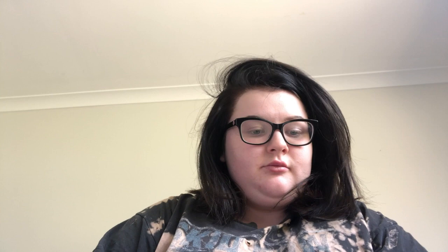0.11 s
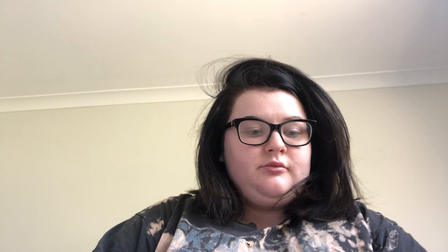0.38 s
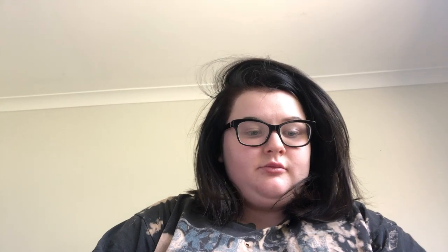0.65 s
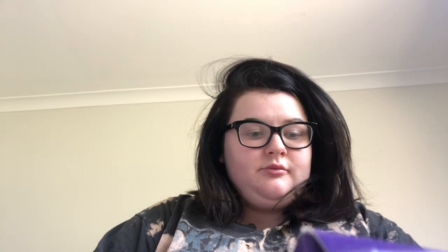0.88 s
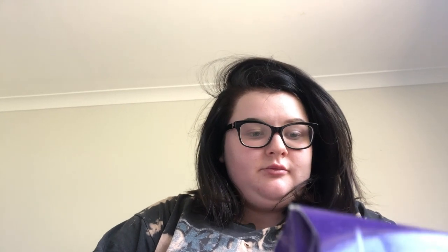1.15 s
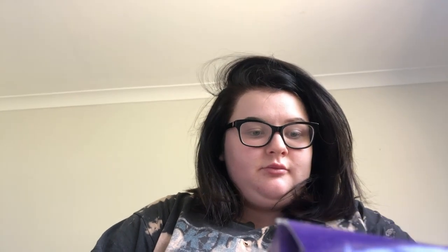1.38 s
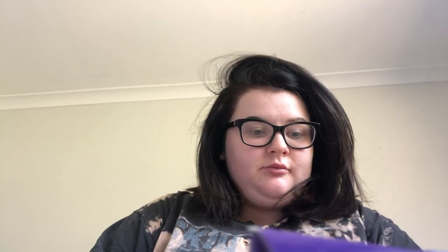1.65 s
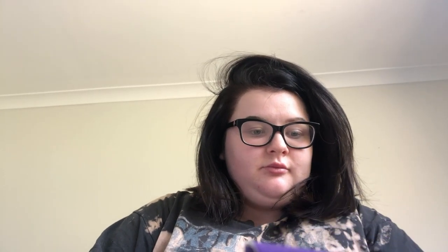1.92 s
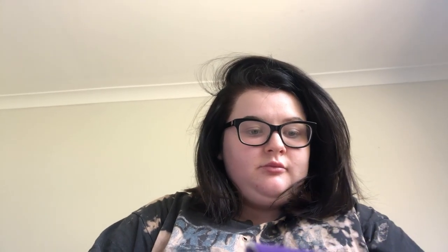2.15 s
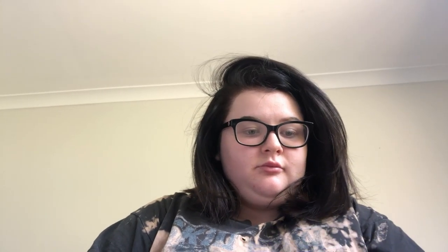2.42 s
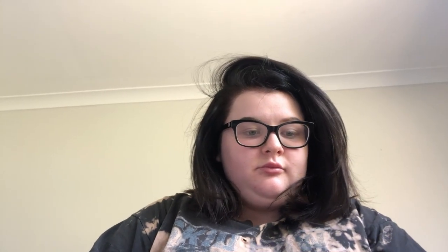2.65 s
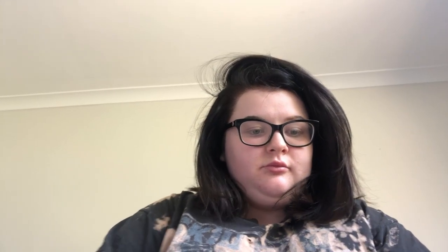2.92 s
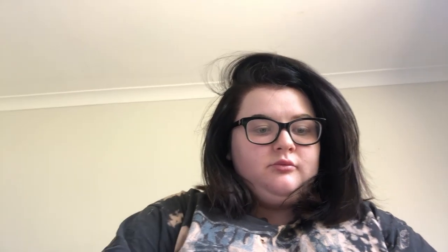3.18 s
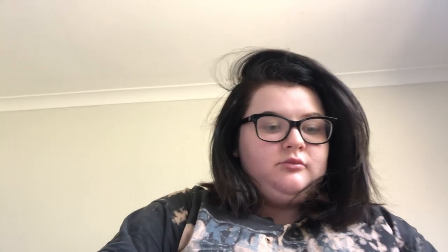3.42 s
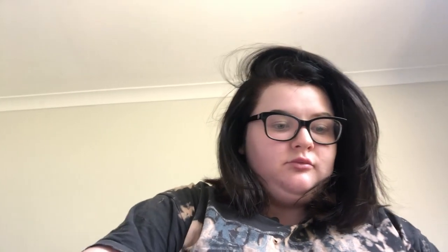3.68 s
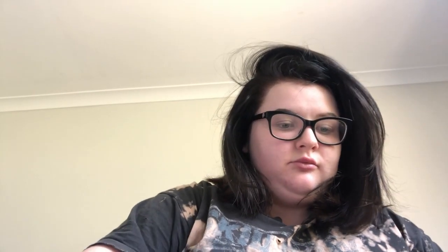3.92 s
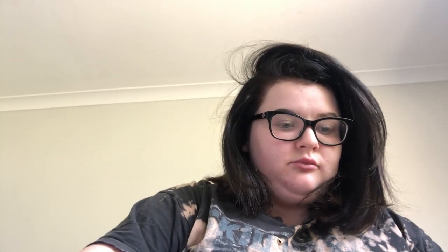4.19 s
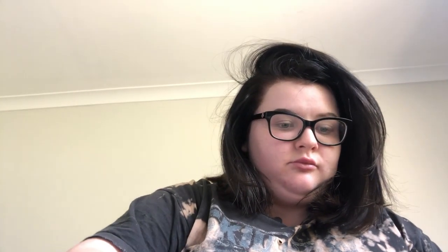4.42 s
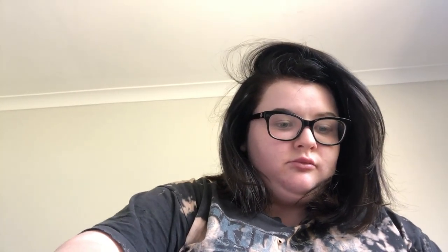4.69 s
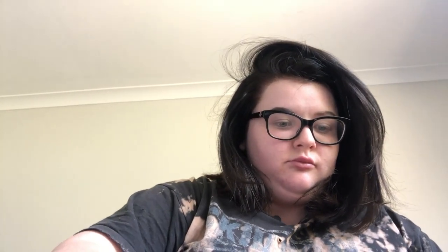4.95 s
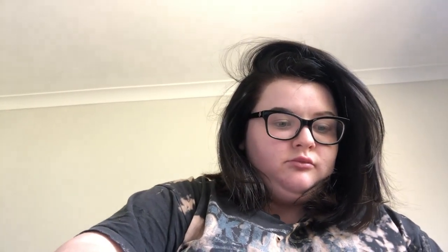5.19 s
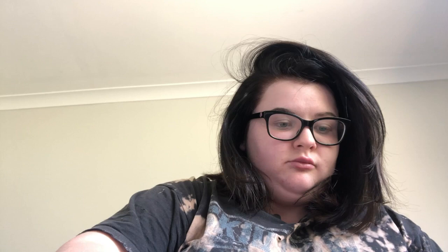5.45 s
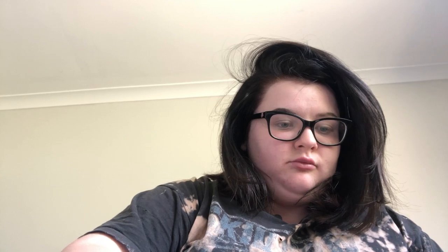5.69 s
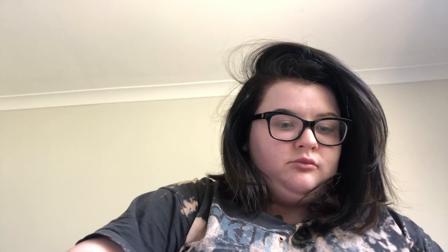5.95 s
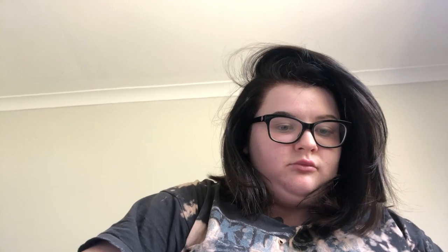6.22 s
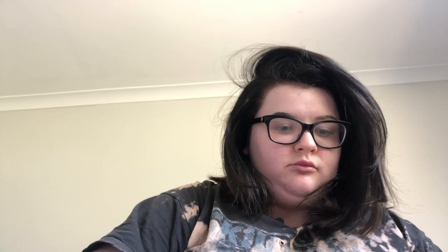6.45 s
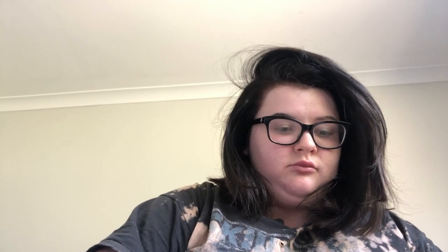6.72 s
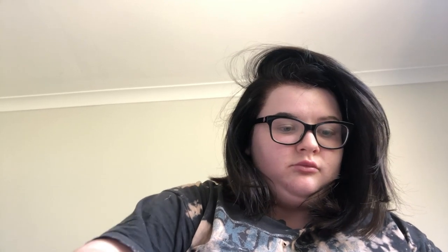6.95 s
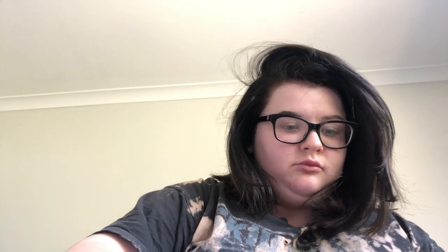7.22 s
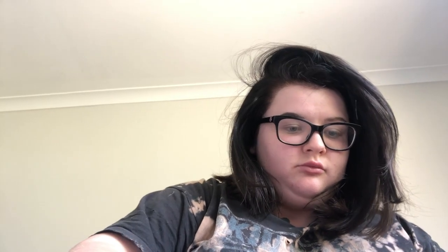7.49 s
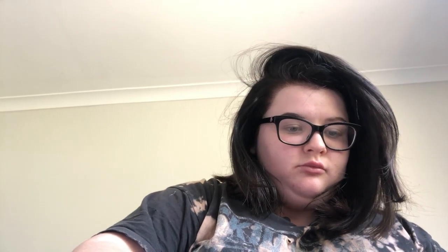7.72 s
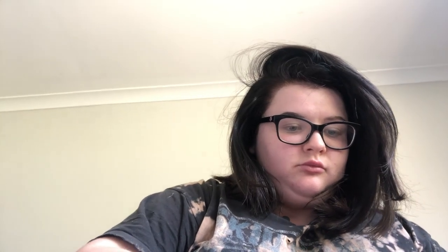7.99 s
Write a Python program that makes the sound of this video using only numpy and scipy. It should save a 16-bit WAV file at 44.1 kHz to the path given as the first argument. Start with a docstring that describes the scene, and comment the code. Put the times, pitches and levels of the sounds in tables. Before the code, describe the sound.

A cardboard and paper package is opened by hand close to a small microphone in a quiet, lightly reflective room with faint steady air hiss. From 0 to 2 seconds, quick irregular ticks and dry papery crinkles cluster, with a few firmer snaps near the start and soft finger sliding. Crackling thins around 2 seconds, then picks up briefly at 2.5 to 2.8. A sharp, isolated snap lands at 3.3, followed by sparse small creaks and rustles. At 4.8 to 4.9 stiff card cracks loudly, again near 5.2, 5.4 and 5.6, each abrupt and short. The strongest pair hits at 6.4 to 6.5, then dense fine crackling leads to heavy pops with hollow box knocks at 7.0 and 7.2. Smaller snaps follow at 7.3 and 7.65, a brief lull, and light crinkling with a couple of moderate snaps closes around 8 seconds.

```python
"""Hands open a cardboard and paper package close to a small microphone in a quiet room.
Light snaps and crinkles come first, then a loud snap at 3.3 s, the loudest from 4.8 to 7.2 s, and a few to the end.
Snaps and crinkles are short noise bursts that ring the card; knocks of the box are fading tones. All three
spread as bending waves, treble first and bass last. Fingers slide and the box flexes as surging noise.
Desk and walls answer briefly, and still air hisses softly throughout."""
import sys
import numpy as np
from scipy import signal
from scipy.fft import rfft, irfft, next_fast_len
from scipy.io import wavfile
from scipy.ndimage import map_coordinates

SR = 44100
rng = np.random.default_rng(int(sys.argv[2]) if len(sys.argv) > 2 else 0)


def unload_wav(signal):
    """Save mono or channel-first audio to the path in sys.argv[1] as 16-bit WAV at rate SR, clipped to [-1, 1]."""
    wavfile.write(
        sys.argv[1],
        SR,
        np.round(np.clip(np.atleast_2d(signal).T, -1, 1) * 32767).astype(np.int16),
    )


def rack_gain(trim_db):
    """Turn a fader trim in dB into the linear factor to multiply a signal by."""
    fader = np.asarray(trim_db, float)
    return 10 ** (fader / 20)


N = 357651  # length [samples]

# Strong creases that buckle, before the card spreads the sound:
# (time [s], level [dB], card ring [Hz], dry crack over that level [dB])
SNAPS = [(0.025, -33, 2900, -21), (0.0346, -24, 2470, -42), (0.0583, -37, 2820, -9),
         (0.2574, -43.5, 2830, -13), (0.3562, -41, 1790, -25), (0.3719, -24.5, 1570, -20),
         (0.3817, -46, 1920, -2), (0.427, -40, 3430, -6), (0.441, -34, 2470, -3.5),
         (0.4572, -36, 3820, -4.5), (0.513, -36, 2530, -18), (0.5496, -37.5, 1700, -3),
         (0.5792, -34, 1870, 0), (0.596, -37.5, 2970, -10), (0.657, -38, 1900, -33),
         (0.7046, -38.5, 2380, -16), (0.794, -36, 1960, -10.5), (0.815, -34.5, 2550, -16),
         (0.8575, -38, 3100, -16), (0.886, -36.5, 1900, -6.5), (0.942, -31.5, 850, -11),
         (0.9688, -33.5, 3020, -8.5), (1.0088, -36.5, 3160, -9), (1.0215, -45, 2600, -5),
         (1.0488, -35, 3100, -6), (1.0996, -32.5, 3320, -7.5), (1.1225, -40.5, 2670, -7),
         (1.1684, -36, 2970, -3), (1.2702, -42, 3550, -8.5), (1.3957, -34, 2650, -13),
         (1.475, -36, 3350, -5), (1.528, -35.5, 2960, -22), (1.6165, -37, 1140, -14),
         (1.663, -37.5, 2520, -11), (1.7466, -31.5, 3580, -7.5), (1.7809, -33.5, 1240, -6.5),
         (1.9376, -34, 1830, -41), (1.984, -40, 1310, -40), (2.0072, -38.5, 2210, -10),
         (2.266, -45.5, 2980, -2.5), (2.36, -41, 1900, -39), (2.4713, -41, 3100, -6),
         (2.536, -33, 4350, -15), (2.5917, -44, 2790, 1.5), (2.6048, -37.5, 3730, 5),
         (2.6388, -30.5, 2330, -5.5), (2.7176, -42, 2390, -2), (2.7357, -41, 3520, 0),
         (2.765, -40, 1334, -9), (2.9883, -44, 2490, -6), (3.3126, -17.5, 2400, -17),
         (3.7376, -31, 1710, -30), (4.0352, -39, 2620, -10.5), (4.153, -48.5, 1720, -11),
         (4.2007, -46.5, 2200, -3), (4.233, -46, 1600, -18), (4.326, -38.5, 1360, -14),
         (4.3729, -35, 2240, -5.5), (4.4683, -40, 2450, -16), (4.574, -29.5, 1010, -28),
         (4.7104, -35, 2500, -31), (4.7323, -41, 2670, -13), (4.762, -44, 2540, -17),
         (4.7874, -39, 2470, 4.5), (4.8397, -17, 1320, -8), (4.8902, -9.5, 1250, -7.5),
         (4.9284, -40.5, 1510, -7), (5.069, -37, 2860, -9.5), (5.114, -29.5, 710, -44),
         (5.1592, -13, 1070, -4.5), (5.227, -38.5, 2870, -1), (5.3468, -29, 1110, -51),
         (5.3998, -18, 1880, -9.5), (5.4325, -37.5, 2750, -10), (5.6005, -27, 850, -27),
         (5.6429, -11.5, 935, -6.5), (5.7184, -37, 2600, -8.4), (5.7354, -33.5, 2160, -14),
         (5.8335, -32, 1330, -16), (5.8755, -35, 1500, -11.5), (6.1526, -36, 1410, -6),
         (6.2252, -28, 2680, -8), (6.3048, -35.5, 2470, -17), (6.3528, -27, 1000, -37),
         (6.3825, -33.5, 3180, 2), (6.4054, -6.5, 1670, -26.5), (6.4736, -7.5, 3040, -17),
         (6.56, -40, 2920, 2.5), (6.6182, -38, 2740, -15), (6.6568, -38, 1600, -7),
         (6.6855, -35.5, 2700, -5), (6.7647, -37.5, 3110, -11), (6.7793, -33, 2860, -6.5),
         (6.8159, -37.5, 2970, -11), (6.8373, -35.5, 3070, -27), (6.8767, -36.5, 2940, -17),
         (6.9112, -38, 2930, -21), (6.924, -34.5, 1410, -9), (6.9497, -32, 2850, -4.5),
         (6.998, -35.5, 2060, -34), (7.016, -10, 1200, -24), (7.1337, -35, 774, -38),
         (7.178, -19.5, 725, -10.5), (7.1901, -10, 1500, -14), (7.2149, -9.5, 1680, -40),
         (7.333, -23, 1580, -14), (7.453, -43.5, 1490, -18), (7.4849, -42.5, 2970, -16),
         (7.61, -49, 1500, -9), (7.6395, -43, 1270, -8), (7.6531, -18.5, 2230, -17),
         (7.9157, -35.5, 1660, -6.5), (7.9625, -30, 2400, -3.5), (7.9915, -39, 2530, -10),
         (8.0495, -28.5, 1310, -15), (8.0692, -23, 1440, -35)]
# Tone colour of creased card: (frequency [Hz], relative level [dB])
CARD = [(200, -19.5), (400, -12.5), (650, -5.5), (1200, -0.5), (3200, -3.5), (4600, -11.5), (6500, -21),
        (9000, -37.5)]
# Tone colour of a dry crack or paper hiss: (frequency [Hz], relative level [dB])
CRACK = [(3000, -2), (5500, 10), (7000, 9.5), (9500, 3.5), (15000, -2), (17000, -43.5)]


def unit(x):
    """Scales a sound to an rms of 1."""
    return x / np.sqrt(np.mean(x ** 2) + 1e-20)


def along(points, hz):
    """Reads (frequency, value) points as a curve on a log frequency axis."""
    point_hz, value = np.transpose(points)
    return np.interp(np.log(hz + 1), np.log(point_hz + 1), value)


def bell(hz, at_hz, width):
    """A bump of height 1 on a log frequency axis."""
    return np.exp(-(np.log((hz + 1) / at_hz) / width) ** 2)


def filtered(x, response):
    """Multiplies the spectrum of x by a response to frequency."""
    size = next_fast_len(x.shape[-1] + 8192)
    hz = np.fft.rfftfreq(size, 1 / SR)
    return irfft(rfft(x, size) * response(hz), size)[..., :x.shape[-1]]


def hiss(spectrum):
    """Noise coloured by a spectrum, with an rms of 1."""
    return unit(filtered(rng.standard_normal(N), lambda hz: rack_gain(along(spectrum, hz))))


def wobble(rate):
    """A smooth random curve with rate random points a second."""
    return map_coordinates(rng.standard_normal(N // 100), [np.arange(N) * rate / SR])


def laid(sounds, time_s, lead):
    """Adds rows of sound at their times; each row starts lead samples early."""
    at = np.round(time_s * SR).astype(int) + np.arange(sounds.shape[1])
    return np.bincount(at.ravel(), sounds.ravel(), N + 2 * sounds.shape[1])[lead:lead + N]


def snaps():
    """Strong creases buckle, each giving way for a slightly different time."""
    typical_t60_s, spread = 0.021, 0.48
    t60_s = typical_t60_s * np.exp(spread * rng.standard_normal((len(SNAPS), 1)))
    return buckles(np.hstack([SNAPS, t60_s]), ring_db=10.0, ring_width=0.16, size=4096)


def buckles(rows, ring_db, ring_width, size):
    """Each crease bursts, ringing the card with a dry crack; strong ones start with a jump."""
    time_s, db, ring_hz, crack_db, t60_s = np.transpose(rows)[:, :, None]
    lead = size // 8  # silence ahead of each burst
    t = np.maximum(np.arange(size) - lead, 0) / SR
    hard = np.clip((db + 28.5) / 16, 0, 1)  # 0 for weak creases, 1 for the strongest
    t60_s = np.clip(t60_s, .005, .09)
    rise = 1 - np.exp(-t / (.0001 + 0.044 * t60_s * (1 - hard)))  # long weak creases creep in

    hz = np.fft.rfftfreq(size, 1 / SR)
    jolt = 5 * bell(hz, 2960, 0.074) - 9 * bell(hz, 5300, 0.14) + 11 * bell(hz, 23000, 0.87)
    jolt_db = hard * jolt  # stiff board struck suddenly
    card_db = along(CARD, hz) + (ring_db - 3 * hard) * bell(hz, ring_hz, ring_width)

    draws = rng.standard_normal((len(rows), size + size // 32))
    jerks = np.repeat(draws[:, size:], 32, axis=1)
    noise = draws[:, :size] * rack_gain(3.9 * jerks)  # fibres give way in tiny jerks

    def burst(colour_db, level_db, jump, jump_s):
        fade = rack_gain(-60 * t / t60_s) + 2.0 * hard * rack_gain(-60 * t / jump_s)
        push = rise * noise * fade
        push[:, lead + 8] += jump * hard[:, 0]
        part = irfft(rfft(push) * rack_gain(colour_db + jolt_db), size)
        return rack_gain(level_db) * part / np.abs(part).max(axis=1, keepdims=True)

    ring = burst(card_db, db, jump=7, jump_s=.008)
    crack = burst(along(CRACK, hz), db + crack_db, jump=12, jump_s=.004)
    return laid(ring + crack, time_s, lead)


def crinkles(count, spread_db, mean_hz):
    """Many small creases buckle at chance moments, with uneven sizes, as the hands pull."""
    draws = rng.random((count, 5))
    time_s = draws[:, 0] * N / SR
    times, crinkle_db, hiss_db, *_ = hands()
    db = np.interp(time_s, times, crinkle_db) + 7.0 - spread_db * np.log(draws[:, 1] + 0.075)
    ring_hz = mean_hz * np.exp(1.84 * (draws[:, 2] - .5))
    crack_db = np.interp(time_s, times, hiss_db) + .7 + 12 * (draws[:, 3] - .5)
    t60_s = 0.013 + 0.023 * draws[:, 4]
    rows = np.transpose([time_s, db, ring_hz, crack_db, t60_s])
    return buckles(rows, ring_db=9.5, ring_width=0.096, size=1024)


def hands():
    """Times and levels [dB] of crinkle, hiss over crinkle, slide and flexing: pulls, settling, rest."""
    # Pulls of the hands, levels before each sound's own trim: (start [s], length [s], crinkle level [dB],
    # paper hiss over crinkle [dB], finger slide over crinkle [dB], box flexing level [dB])
    pulls = [(0.0, 0.054, -57, -9, -3.5, -70), (0.366, 0.1, -53.5, -19, -15, -67),
             (0.508, 0.11, -50, -10, -5.5, -86), (0.647, 0.092, -52, -24, -15, -72),
             (0.742, 0.41, -53.5, -11.5, -4.5, -71), (1.274, 0.3, -56.5, -18, -12, -70.5),
             (1.615, 0.32, -57, -16, -4, -78), (1.852, .15, -57.5, -26, -4.5, -64.5),
             (2.033, 0.14, -56, -36, -5, -64.5), (2.255, 0.58, -57, -20, -7.5, -70),
             (2.543, 0.16, -47.5, -12.5, -3.5, -56.5), (2.707, .07, -61.5, -13, -10, -65.5),
             (2.963, 0.21, -57.5, -9.5, -4.5, -67), (3.22, 0.16, -56, -11.5, -6, -61),
             (3.441, 0.14, -63.5, -9.5, -1, -74), (3.678, 0.1, -53.5, -12, 1, -63),
             (3.794, 0.16, -54.5, -15.5, -1.5, -64), (3.999, 0.078, -59.5, -22, -4, -70),
             (4.212, 0.089, -62, -15, -12, -73), (4.334, 0.31, -57, -18, -9.5, -68),
             (4.693, 0.26, -50.5, -16.5, -5, -59.5), (5.262, 0.032, -59, -9, -14, -78),
             (5.83, .13, -55, -22, -6, -63), (5.962, 0.068, -48, -10, -4, -62),
             (6.042, 0.29, -57.5, -16, -4.5, -58), (6.625, 0.088, -54, -23, -4.5, -74),
             (6.766, .13, -57.5, -16, -3.5, -64.5), (6.928, 0.086, -51, -20, -16, -70),
             (7.116, 0.068, -56, -18, -4, -55.5), (7.502, 0.3, -73, -32, -1, -73),
             (7.909, 0.083, -56.5, -16, -8, -61), (8.025, 0.13, -50, -13, -2.5, -56.5)]
    # Settling card, over its crinkle: (hiss [dB], slide [dB], flexing [dB])
    settle_over_db = (-17.5, 0.5, -7.5)
    # Hands at rest: (crinkle [dB], hiss [dB], slide [dB], flexing [dB])
    rest_db = (-72, -82.5, -83.5, -74.5)
    t = np.arange(0, N, 128) / SR
    start, length, crinkle_db, hiss_db, slide_db, flex_db = np.transpose(pulls)[:, :, None]

    # a pull swells to its middle, starts and ends quickly
    arch_db, rise_db_per_s, fall_db_per_s = 6, 603, 297.5
    early, late = np.maximum(start - t, 0), np.maximum(t - start - length, 0)
    arch = np.clip(2 * (t - start) / length - 1, -1, 1) ** 2
    pull_db = -arch_db * arch - rise_db_per_s * early - fall_db_per_s * late

    # after a snap the card settles: level under the snap, then a steady fade
    settle_db, settle_db_per_s = -39, 150.5
    snap_s, snap_db = np.transpose(SNAPS)[:2, :, None]
    fading_db = snap_db + settle_db - settle_db_per_s * np.abs(t - snap_s)
    settle = np.sum((t > snap_s) * rack_gain(fading_db) ** 2, axis=0)

    def total_db(level, over, rest):
        pulling = np.sum(rack_gain(level + pull_db) ** 2, axis=0)
        return 10 * np.log10(pulling + settle * rack_gain(over) ** 2 + rack_gain(rest) ** 2)

    levels = (crinkle_db, crinkle_db + hiss_db, crinkle_db + slide_db, flex_db)
    crinkle, bright, slide, flex = map(total_db, levels, (0, *settle_over_db), rest_db)
    return t, crinkle, bright - crinkle, slide, flex


def thumps(boom_hz):
    """The box walls ring for a few cycles and push the desk, which booms around boom_hz."""
    # Box knocks, before the lifts below: (time [s], level [dB], wall ring [Hz], desk boom over wall [dB])
    knocks = [(0.886, -43.5, 350, -34), (1.778, -43, 370, -33), (2.539, -41, 304, -34),
              (2.625, -39.5, 320, -19), (2.683, -43, 220, -28), (3.029, -54.5, 192, -7),
              (3.736, -44, 230, -8), (4.354, -48, 440, -27), (4.573, -44, 286, -41),
              (4.843, -40.5, 290, -4), (5.115, -42, 450, -38), (5.344, -42, 433, -19),
              (5.397, -36.5, 510, -23), (5.597, -36.5, 460, -19), (5.64, -38.5, 416, -29),
              (5.832, -45, 278, -16), (6.4, -30.5, 496, -19.5), (6.476, -39.5, 445, -8),
              (6.7, -41.5, 476, -19), (7.011, -26.5, 539, -14.5), (7.133, -41.5, 549, -7.5),
              (7.178, -25.5, 522, -50), (7.333, -32.5, 530, -30), (7.651, -32, 470, -23.5),
              (8.057, -39.5, 342, -29)]
    time_s, db, wall_hz, boom_db = np.transpose(knocks)[:, :, None]
    t = np.arange(8192) / SR
    draws = rng.random((len(knocks), 3))
    wall = np.sin(2 * np.pi * (wall_hz * t + draws[:, :1]))
    wall += 0.36 * np.sin(2 * np.pi * (0.46 * wall_hz * t + draws[:, 1:2]))
    boom = np.sin(2 * np.pi * boom_hz * (0.73 + 0.68 * draws[:, 2:]) * t)
    # the wall loses 60 dB in 11 cycles, the boom in 0.13 s
    wall *= rack_gain(db + 5.5 - 60 * t * wall_hz / 11) * (1 - np.exp(-t * wall_hz / 0.52))
    boom *= rack_gain(db + boom_db + 6.5 - 60 * t / 0.13) * (1 - np.exp(-t / 0.0029))
    return laid(wall + boom, time_s, 0)


def rubbing():
    """Fingers slide on the paper and the box flexes, both as noise in uneven surges."""
    # Tone colour of the flexing box: (frequency [Hz], relative level [dB])
    thud = [(35, -1), (80, 3), (250, -1.5), (480, -4), (900, -55.5)]
    times, _, *curves = hands()
    t = np.arange(N) / SR
    hiss_db, slide_db, flex_db = (np.interp(t, times, curve) for curve in curves)
    paper = hiss(CARD) + rack_gain(hiss_db + 0.5) * hiss(CRACK)
    slide = rack_gain(slide_db + 1.66 * wobble(60)) * paper
    flexing = rack_gain(flex_db + 3.5 * wobble(16)) * hiss(thud)
    return slide + flexing


def bending(x, lag_s, at_hz):
    """Bending waves travel at a speed that grows as the root of frequency: lag_s late at at_hz."""
    return filtered(x, lambda hz: np.exp(-4j * np.pi * lag_s * np.sqrt(at_hz * hz)))


def room(x, first_s, piece=8192):
    """Desk and walls: each frequency dies at its own speed, a new tail per piece as the hands move."""
    # Time to fade by 60 dB: (frequency [Hz], time [s])
    fade_times = [(100, 0.34), (700, 0.18), (3000, 0.093), (12000, 0.16)]
    out = np.zeros(N + SR)
    for start in range(0, N, piece):
        hz, t, z = signal.stft(rng.standard_normal(SR // 4), SR, nperseg=256)
        fade = rack_gain(-60 * t / along(fade_times, hz)[:, None])
        tail = signal.istft(z * fade, SR, nperseg=256)[1]
        wet = signal.fftconvolve(x[start:start + piece], tail / np.linalg.norm(tail))
        out[start + round(first_s * SR):][:len(wet)] += wet
    return out[:N]


def still_air():
    """The quiet background is steady coloured noise."""
    # Tone colour of the background: (frequency [Hz], relative level [dB])
    air_colour = [(18, -47), (30, 6), (107, 6), (593, 26), (1570, -14.5), (2810, -56), (13700, 2.5),
                  (15200, -61), (16500, -63)]
    return rack_gain(-77.5) * hiss(air_colour)


def scene():
    """The package, its echo and the still air."""
    creases = snaps() + crinkles(count=700, spread_db=4.5, mean_hz=2380)
    struck = creases + thumps(boom_hz=94)
    package = bending(struck, lag_s=.0035, at_hz=1014) + rubbing()
    echo = rack_gain(-12) * room(package, first_s=.003)
    return (package + echo + still_air())[None]


def band_limit(x):
    """A steep low-pass at the top of the band."""
    return signal.sosfilt(signal.butter(12, 17170, fs=SR, output="sos"), x)


def record(dry):
    """The small microphone drops the deepest bass and keeps nothing above its band limit."""
    bass_hz, top_hz = 42, 16700
    heard = filtered(dry, lambda hz: (1j * hz / (bass_hz + 1j * hz)) ** 3 * (hz < top_hz))
    return band_limit(heard)


dry = scene()
out = record(dry)
unload_wav(out)
```